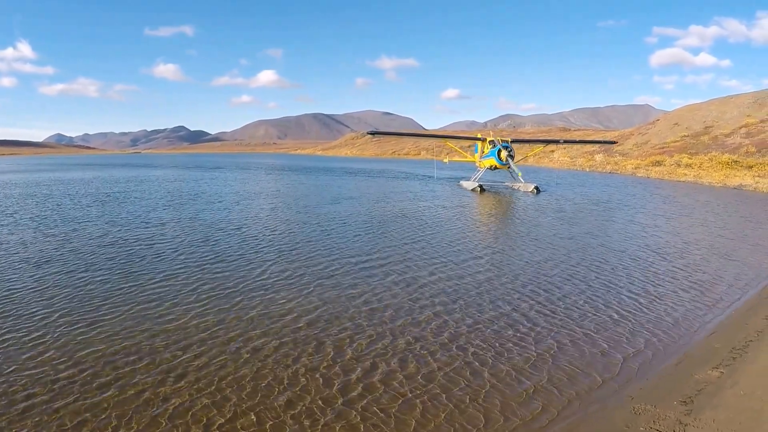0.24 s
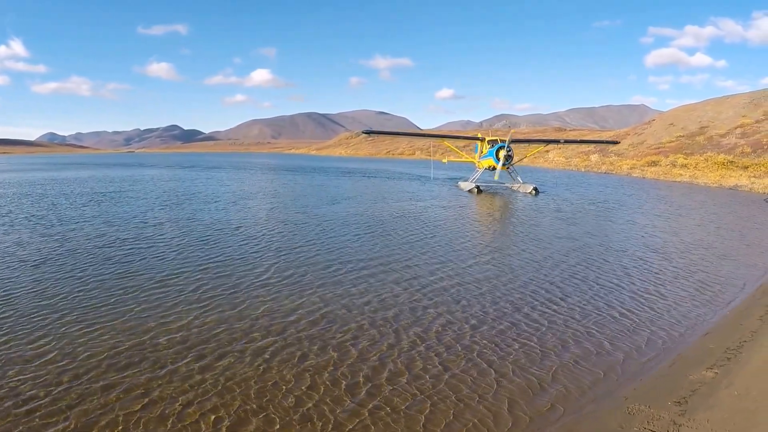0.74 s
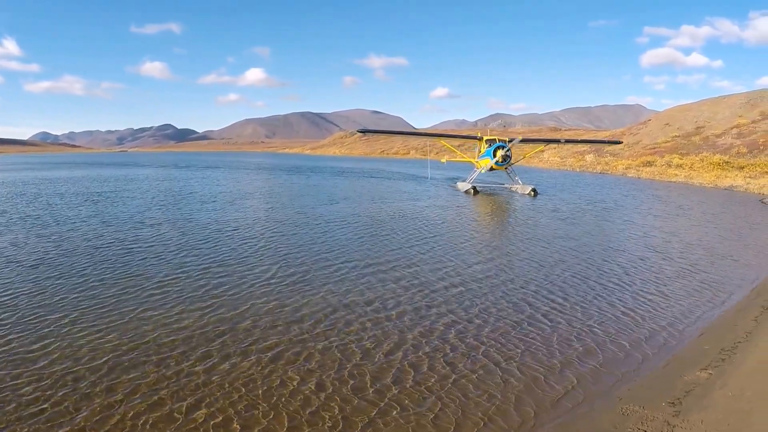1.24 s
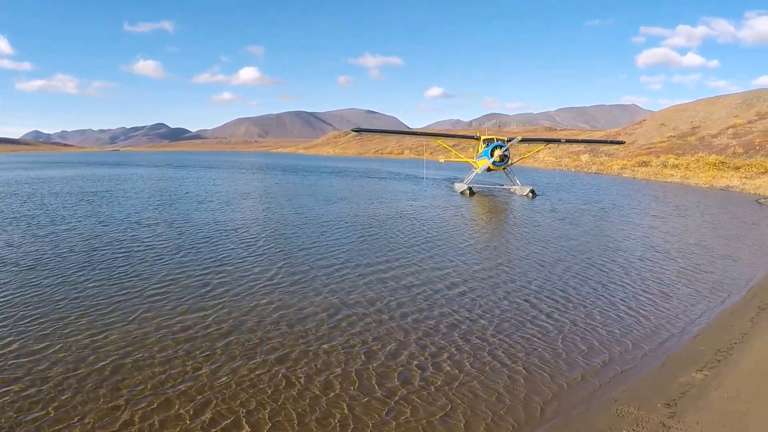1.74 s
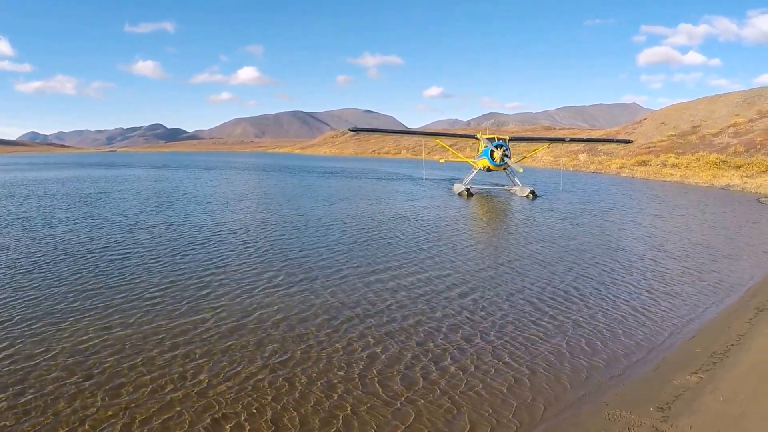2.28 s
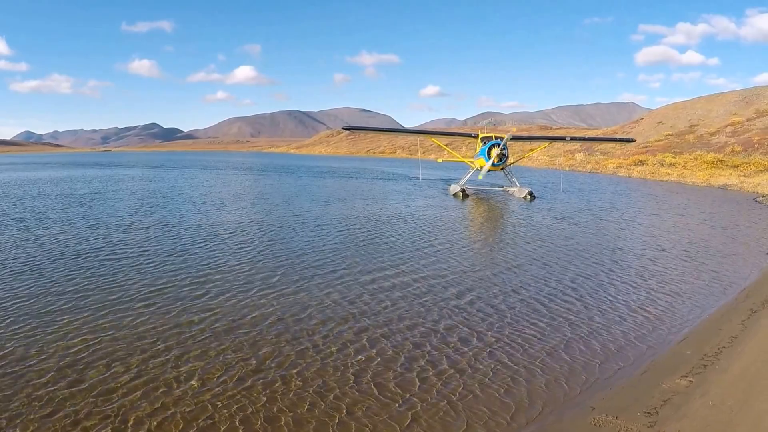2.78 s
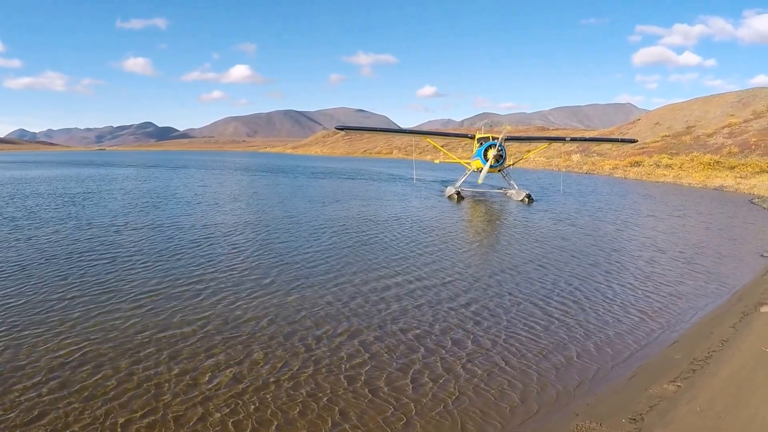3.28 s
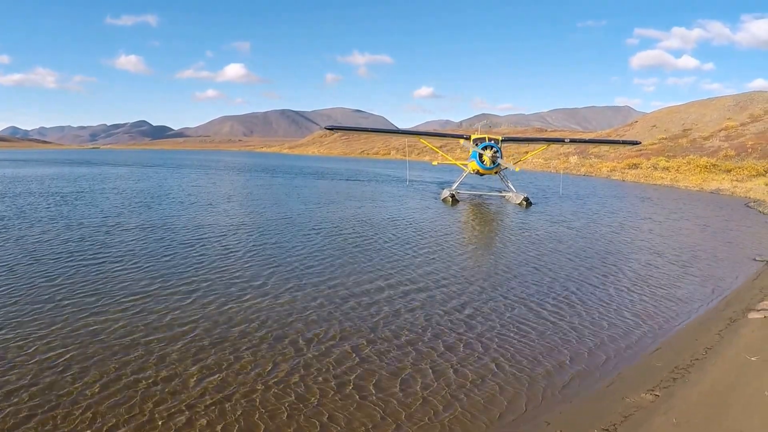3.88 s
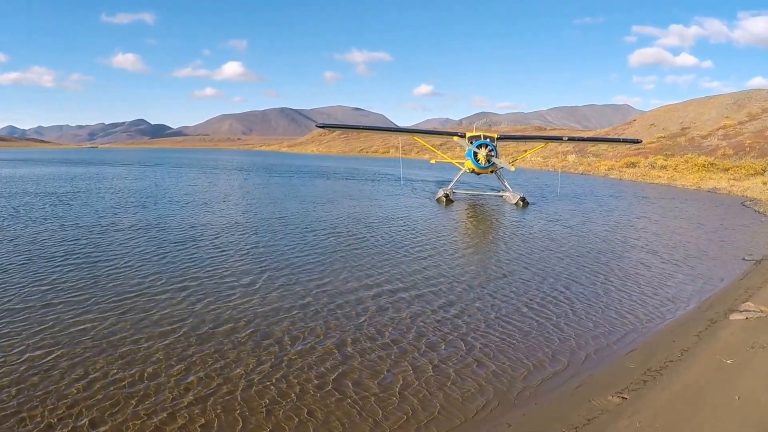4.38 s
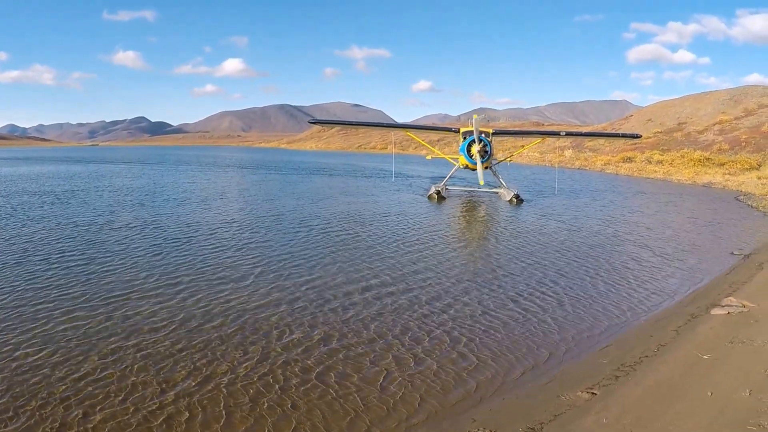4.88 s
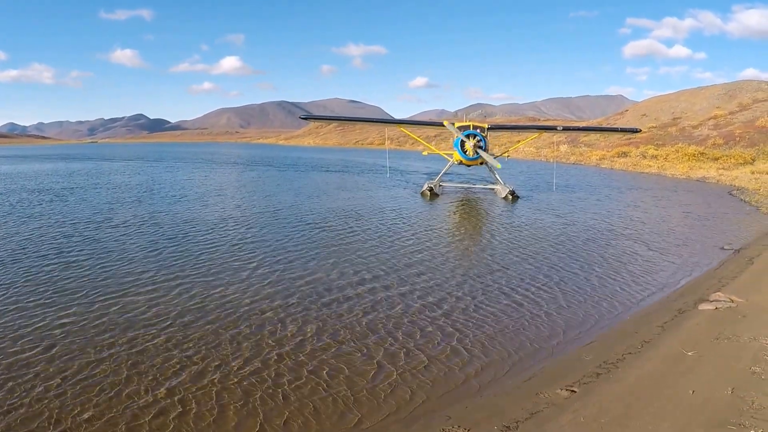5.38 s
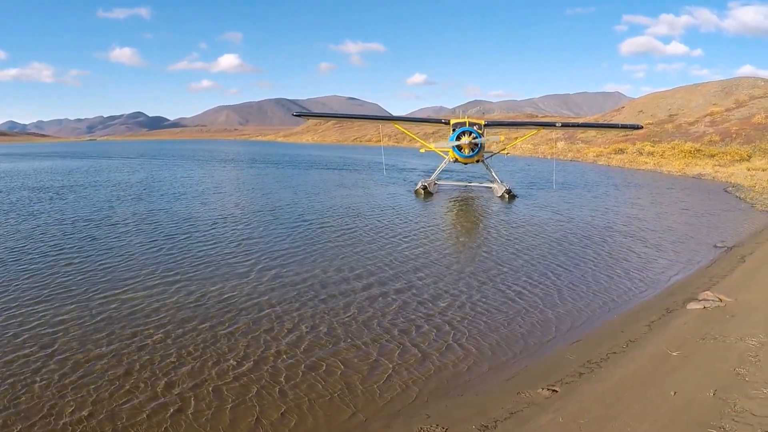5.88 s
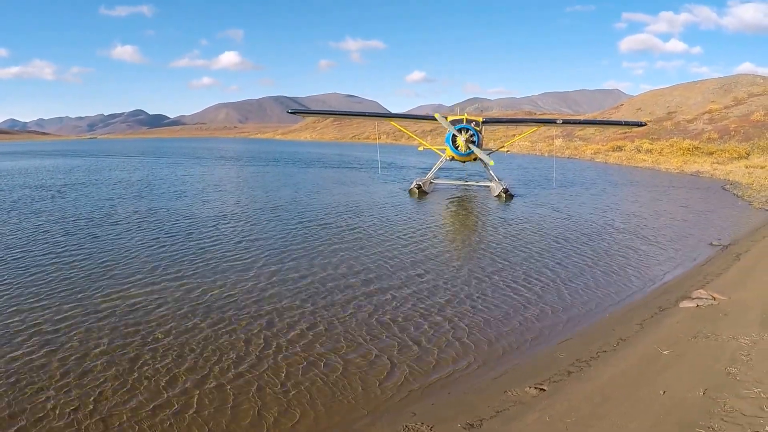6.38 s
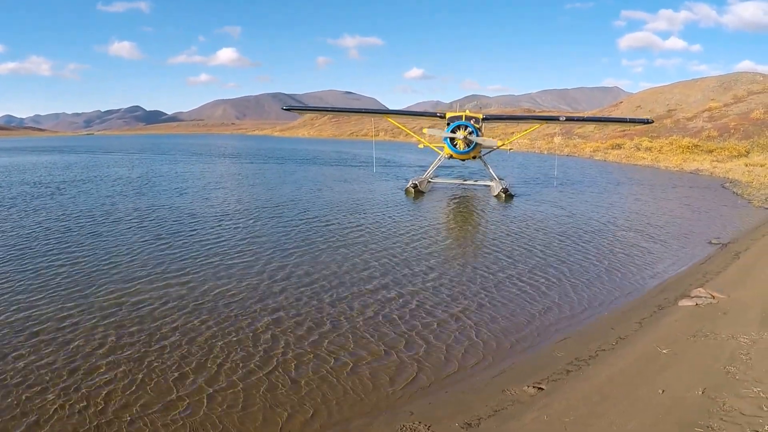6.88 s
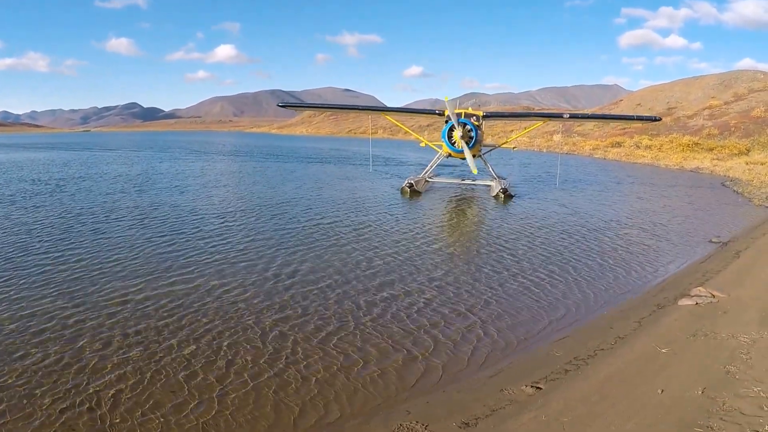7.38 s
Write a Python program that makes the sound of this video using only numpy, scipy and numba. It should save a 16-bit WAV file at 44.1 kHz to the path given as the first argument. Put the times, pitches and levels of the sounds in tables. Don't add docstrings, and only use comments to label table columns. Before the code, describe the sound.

Outdoors by a lake, strong wind thrums and slaps the microphone over the uneven idling putter of a floatplane's piston engine, gradually softening.

```python
import sys
import numpy as np
from scipy import signal
from scipy.fft import rfft, irfft, next_fast_len
from scipy.io import wavfile
from scipy.ndimage import uniform_filter1d
from numba import njit

SR = 44100
rng = np.random.default_rng(int(sys.argv[2]) if len(sys.argv) > 2 else 0)


def output_pcm(signal):
    pcm = np.clip(np.atleast_2d(signal).T, -1, 1) * 32767
    wavfile.write(sys.argv[1], SR, np.round(pcm).astype(np.int16))


def voltage_ratio(level):
    return 10 ** (np.asarray(level, float) / 20)


N = 336924
TIME = np.arange(N) / SR

# time in seconds, level in dB.
GUST_CURVE = [(0.0, -19), (0.5, -27.5), (0.9, -21.5), (1.2, -26), (1.5, -24), (2.3, -19.5), (2.6, -21.5),
              (3.54, -28.5), (3.73, -16.5), (3.96, -28), (4.32, -18.5), (4.85, -28), (5.5, -19.5),
              (6.15, -24), (6.5, -33.5), (7.3, -35.5), (7.46, -25.5), (7.64, -31)]
# start in seconds, ring level in dB, hiss level in dB, sharpness in dB above the hiss.
RINGING_FIRINGS = [(0.429, -39, -41, -23), (0.779, -38, -41, -29), (0.94, -42, -43, -23),
                   (1.468, -35, -38, -34), (1.621, -34.5, -39.5, -30), (2.278, -34, -42.5, -29),
                   (2.321, -38, -47, -25), (2.585, -38.5, -39, -12), (2.754, -33.5, -52, -20),
                   (2.889, -39, -36.5, -19), (3.399, -42, -48, -21), (3.555, -37, -36, -15),
                   (4.534, -42, -40.5, -27), (5.418, -35, -41, -6), (5.523, -35, -56, -25),
                   (5.631, -36.5, -46, -24.5), (5.878, -34, -40.5, -25), (5.937, -41, -51, -29),
                   (6.105, -39.5, -44, -25), (6.395, -38, -41.5, -23), (6.464, -40.5, -40.5, -30),
                   (6.535, -37.5, -45.5, -23), (6.651, -38, -41.5, -30), (6.789, -37, -57, -31),
                   (7.005, -36, -44, -18), (7.082, -41, -43, -24), (7.168, -39, -45.5, -16),
                   (7.319, -35, -43.5, -21), (7.5, -38, -68, -31), (7.585, -42, -41.5, -34)]


def level(x):
    return x / np.sqrt(np.mean(x ** 2))


def curve(table, t):
    return np.interp(t, *np.transpose(table))


@njit
def svf(x, hz, width):
    y, band_state, low_state = np.empty(len(x)), 0., 0.
    for i in range(len(x)):
        g = np.tan(np.pi * hz[i] / SR)
        k = width / hz[i]
        v = (band_state + g * (x[i] - low_state)) / (1 + g * (g + k))
        band_state = 2 * v - band_state
        low_state = low_state + 2 * g * v
        y[i] = k * v
    return y


def band(hz, width_hz):
    hz = hz + np.zeros(N)
    once = svf(rng.standard_normal(N), hz, 1. * width_hz)
    return level(svf(once, hz, 1. * width_hz))


def coloured(shape):
    hz, db = np.transpose(shape)
    size = next_fast_len(N)
    log_hz = np.log(np.arange(size // 2 + 1) * SR / size + 1)
    gain = voltage_ratio(np.interp(log_hz, np.log(hz), db, left=-90, right=-90))
    return level(irfft(rfft(rng.standard_normal(size)) * gain, size)[:N])


def walk(rate):
    k = int(SR / rate)
    held = np.repeat(rng.standard_normal(N // k + 1), k)
    x = uniform_filter1d(uniform_filter1d(held, k), k)[:N]
    return x / x.std()


def patchy(x, width_hz, seconds, depth_db):
    spectrum = signal.stft(x, nperseg=256)[2]
    field = rng.standard_normal(spectrum.shape)
    for axis, size in enumerate((width_hz * 256 / SR, seconds * SR / 128)):
        size = max(int(round(size)), 1)
        field = uniform_filter1d(uniform_filter1d(field, size, axis=axis), size, axis=axis)
    gain = voltage_ratio(depth_db * field / field.std())
    return level(signal.istft(spectrum * gain, nperseg=256)[1][:N])


def wind():
    # peak in seconds, level in dB, half length in seconds.
    swells = [(0.0, -11, 0.01), (0.182, -12, 0.046), (0.454, -23.5, .05), (0.69, -17.5, 0.032),
              (1.026, -18, 0.088), (1.304, -13, 0.028), (1.46, -16, 0.038), (1.844, -15.5, 0.1),
              (2.355, -16.5, 0.052), (2.589, -13, 0.055), (2.847, -21.5, 0.24), (3.254, -21.5, 0.21),
              (3.696, -25, 0.035), (4.17, -22, 0.13), (4.757, -21, 0.061), (4.973, -11.5, 0.026),
              (5.33, -25.5, 0.087), (5.517, -16.5, 0.038), (5.906, -25, .2), (6.236, -17, 0.016),
              (6.41, -25.5, 0.11), (6.703, -17.5, 0.012), (7.43, -23.5, 0.029), (7.596, -27, .02)]
    gust_db = curve(GUST_CURVE, TIME)
    power = voltage_ratio(gust_db - 0.5) ** 2
    for s, db, half_s in swells:
        power = power + voltage_ratio(db) ** 2 * np.exp(-((TIME - s) / half_s) ** 2)
    thrum_hz = 58.25 * (1 + 0.02998 * walk(4))
    phase = 2 * np.pi * np.cumsum(thrum_hz * (1 + 0.084 * walk(24))) / SR
    overtone = 0.14 * np.cos(2 * phase + 1.35 * walk(9))
    tone = np.sqrt(2) * (np.sin(phase) + overtone)
    thrum = (0.81 * tone * voltage_ratio(2.9 * walk(23.956)) + 0.8 * band(thrum_hz, 32.0)) * np.sqrt(power)
    rumble = band(30.7, 24.0) * voltage_ratio(gust_db - 0.5 - walk(3))
    flutter = band(125.4, 75.6) * voltage_ratio(gust_db - 8.5 + 3.65 * walk(22))
    return thrum + rumble + flutter


def swirls(count=3):
    # time in seconds, swing in Hz, peak in dB, length in seconds of the train they shed.
    slaps = [(0.054, 218, -18.5, 0.076), (0.196, 140, -20, 0.017), (0.31, 300, -14, 0.019),
             (0.429, 268, -16.5, 0.028), (0.831, 131, -12, 0.073), (1.321, 192, -20, 0.015),
             (1.437, 126, -10.5, 0.041), (1.467, 437, -8.5, .02), (1.637, 159, -15, 0.019),
             (1.695, 315, -15.5, 0.11), (1.922, 437, -14, 0.085), (2.343, 218, -15, 0.024),
             (2.592, 406, -13.5, 0.13), (3.011, 370, -22.5, 0.021), (3.722, 290, -17.5, 0.12),
             (4.169, 266, -18, 0.023), (4.27, 243, -13, .08), (4.4, 287, -11.5, 0.063),
             (4.51, 192, -23, .03), (4.699, 136, -18, 0.026), (4.956, 242, -10.5, 0.14),
             (5.208, 218, -17.5, 0.035), (5.319, 278, -6, 0.059), (5.526, 500, -6.5, .02),
             (5.6, 297, -13.5, 0.046), (5.72, 229, -16, .05), (5.817, 314, -8.5, .03),
             (5.987, 231, -10, 0.062), (6.137, 167, -17, 0.013), (7.483, 200, -21, .02)]
    s, hz, db, train_s = np.transpose(slaps)
    heave = (s + 0.0069, 50.7 + 0 * s, db - 6)
    spit = (s - .002, hz * 1.72, db - 12)

    lag, pitch, size = rng.random((len(slaps), count, 3)).T
    order = np.arange(count)[:, None]
    shed_s = s + train_s * (order + lag) / count
    shed_hz = hz * 2 ** (.8 * (2 * pitch - 1) - .6)
    shed_db = db - 5.5 * (.5 + size) - 2 * order
    shed = np.reshape((shed_s, shed_hz, shed_db), (3, -1))

    place, pitch, size = rng.random((150, 3)).T
    stray_s = (np.arange(150) + place) / 8.3
    stray_hz = 160.5 * 2 ** (1.2 * pitch ** 2)
    stray_db = curve(GUST_CURVE, stray_s) - 1.5 + 3.5 * (2 * size - 1)
    stray = np.array([stray_s, stray_hz, stray_db])[:, stray_s < TIME[-1]]
    return np.hstack([(s, hz, db), heave, spit, shed, stray]).T


def eddies(turns=0.77, base_db=-4, wake_db=-9):
    out = np.zeros(N + SR)
    margin = np.zeros(2000)
    coarse_wake = np.concatenate([margin, band(170, 114), margin])
    fine_wake = np.concatenate([margin, band(380, 247), margin])
    rows = swirls()
    chance = rng.random((len(rows), 3))
    for (s, hz, db), (phase, base_phase, lag) in zip(rows, chance):
        t = np.arange(-2000, 2000) / SR * hz
        swing = np.exp(-.5 * (t / turns) ** 2) * np.cos(2 * np.pi * (t + phase))
        u = 0.443 * t - 0.87 * (lag - .5)
        base = np.exp(-.5 * (u / turns) ** 2) * np.cos(2 * np.pi * (u + base_phase))
        start = int(s * SR)
        wake = fine_wake if int(hz) > 280 or hz > 280 else coarse_wake
        ragged = wake[start:start + len(t)] * np.exp(-.5 * ((t - .6) / 1.26) ** 2)
        slap = swing + voltage_ratio(base_db) * base + voltage_ratio(wake_db) * ragged
        out[start:start + len(t)] += voltage_ratio(db - 3.5) * np.hanning(len(t)) * slap
    return out[2000:N + 2000]


def wash():
    # time in seconds, level in dB.
    roar_curve = [
        (0.0, -42),
        (1.42, -42),
        (2.36, -38.5),
        (3.36, -40.5),
        (4.6, -41.5),
        (6.23, -44),
        (7.4, -49.5),
        (7.64, -51),
    ]
    # frequency in Hz, density in dB per Hz.
    low_spectrum = [(150, -38), (250, -29), (410, -8.5), (615, -5.5), (828, -11.5), (1110, 4.5), (1230, 0),
                    (1380, -3), (1800, -11), (2340, -40), (3960, -120)]
    high_spectrum = [(880, -29.5), (1500, -5), (1930, 2), (2940, 3.5), (4160, -6.5), (5720, -9.5),
                     (8410, -23.5), (13800, -31), (15000, -32)]
    low_db = curve(roar_curve, TIME)
    high_db = low_db - 6 - 0.26 * TIME
    flicker = walk(26)
    low = patchy(coloured(low_spectrum), width_hz=330, seconds=.014, depth_db=3.0)
    high = patchy(coloured(high_spectrum), width_hz=400, seconds=.012, depth_db=3.5)
    return low * voltage_ratio(low_db + 0.57 * flicker) + high * voltage_ratio(high_db + 0.5 + 0.72 * flicker)


def firings():
    # peak in seconds, hiss level in dB, whistle in dB above the hiss.
    blows = [(0.045, -36, -22), (0.124, -34, -12), (0.195, -36, 2), (0.234, -33.5, -9), (0.416, -39.5, -24),
             (0.649, -38.5, 1), (0.726, -44, -24), (0.847, -34.5, 3.5), (0.887, -35.5, -16),
             (0.969, -36.5, -6), (1.001, -36.5, -2), (1.042, -36, -4), (1.12, -34, 5.5), (1.272, -34, -3),
             (1.418, -39, -11), (1.571, -35.5, 3.5), (1.649, -41, 1), (1.683, -34.5, -11), (1.721, -38, 7),
             (1.793, -33, -3), (1.83, -40, -14), (1.862, -39.5, 1), (1.941, -36.5, 2.5), (2.086, -37, -3.5),
             (2.226, -40, 2.5), (2.34, -32.5, -24), (2.375, -38.5, -3), (2.446, -35.5, 1), (2.708, -43, 6),
             (2.843, -35.5, -1.5)]
    # peak in seconds, hiss level in dB, sharpness in dB above the hiss.
    pops = [(0.58, -38, -29), (2.303, -40.5, -15), (2.506, -38, -9.5), (3.046, -45.5, -11),
            (3.212, -39.5, -24), (3.621, -43, -13), (3.743, -47, -19), (3.838, -43, -14),
            (3.919, -39.5, -36), (4.036, -47, -3.5), (4.128, -44, -25), (4.309, -35.5, -22),
            (4.474, -49.5, 0.5), (4.663, -40, -6), (4.719, -35.5, -21), (4.952, -39, -28), (5.304, -43, -4),
            (5.473, -42, -19), (5.505, -42, -8), (5.675, -42.5, -19), (5.721, -40.5, -12),
            (5.837, -42, -33), (6.001, -43, -35), (6.155, -46, -22), (6.282, -38.5, -43),
            (6.337, -42.5, -34), (6.705, -45.5, -26), (6.935, -45, -31), (6.971, -45.5, -20),
            (7.393, -36, -44)]
    # time in seconds, firings per second.
    pace = [
        (0, 28.5),
        (2.9, 29.5),
        (7.64, 24),
    ]
    pop_whistle_db = -7.5
    blow_s, blow_db, blow_whistle_db = np.transpose(blows)
    pop_s, pop_db, pop_sharp_db = np.transpose(pops)
    ring_s, _, ring_db, ring_sharp_db = np.transpose(RINGING_FIRINGS)
    puff_s = ring_s - 0.005
    strong = np.hstack([(blow_s, blow_db, blow_whistle_db, -9.5 + 0 * blow_s),
                        (pop_s, pop_db, pop_whistle_db + 0 * pop_s, pop_sharp_db),
                        (puff_s, ring_db, pop_whistle_db + 1.5 + 0 * ring_s, ring_sharp_db)])

    chance = rng.standard_normal((240, 4)).T
    fired = np.cumsum(curve(pace, TIME)) / SR
    s = np.interp(np.arange(240), fired, TIME) + 0.0062 * chance[0]
    weak_db = -48.5 - 1.0 * s + 6 * chance[1]
    weak = np.array([s, weak_db, pop_whistle_db + 3.2 * chance[2], -26.5 + 9.0 * chance[3]])
    free = np.abs(s[:, None] - strong[0]).min(axis=1) > .02
    return np.hstack([strong, weak[:, free & (s > 0) & (s < TIME[-1] - .03)]])


def puffs(s, db, stretch, rise, fall, tail, tail_db):
    out = np.zeros(N + SR)
    for start, gain, wide in zip((s * SR).astype(int), voltage_ratio(db), stretch):
        t = np.arange(-1500, 6000) / SR / wide
        before = t < 0
        span = np.where(before, 1.16 * rise * wide, fall)
        peak = np.exp(-.5 * np.abs(t / span) ** np.where(before, 3.5, 2))
        scattered = voltage_ratio(tail_db) * (t > 0) * (1 - peak) * np.exp(-t * wide / tail)
        out[start:start + len(t)] += gain * (peak + scattered)
    return out[1500:N + 1500]


def exhaust():
    # frequency in Hz, density in dB per Hz.
    hiss_spectrum = [(880, -29), (1500, -9), (1770, -5), (2130, -3.5), (2900, -5.5), (4620, -9),
                     (5330, -11.5), (6970, -16.5), (9000, -28.5), (11700, -52), (19800, -120)]
    s, db, whistle_db, sharp_db = firings()
    stretch = np.clip(1 + 0.027 * (sharp_db + 15.5), .45, 1.6)

    gas = voltage_ratio(2.44 * walk(180)) * patchy(coloured(hiss_spectrum), width_hz=350, seconds=.016, depth_db=3.5)
    hiss = gas * puffs(s, db + 0.057, stretch, rise=0.0057, fall=0.0098, tail=0.021, tail_db=-10.0)
    lip = band(2090 * (1 + 0.02 * walk(9.2)), 150)
    whistle = lip * puffs(s, db + whistle_db + .5, stretch, rise=0.0039, fall=0.006, tail=0.024, tail_db=-10.5)
    top = patchy(band(5500, 8700), width_hz=500, seconds=.008, depth_db=0.5)
    sharp = top * puffs(s, db + sharp_db - .5, stretch, rise=0.0042, fall=0.0049, tail=0.024, tail_db=-7.0)

    ring_s, ring_db = np.transpose(RINGING_FIRINGS)[:2]
    stub = band(1170 * (1 + 0.074 * walk(14)), 700)
    throat = voltage_ratio(1.0 + 4.0 * walk(20)) * band(610 * (1 + 0.13 * walk(13)), 160)
    every = puffs(s, db - 10.5, stretch, rise=0.0074, fall=0.0093, tail=0.051, tail_db=-8.5)
    loud = puffs(ring_s, ring_db - .5, np.ones(len(ring_s)), rise=0.0054, fall=0.0073, tail=0.015, tail_db=-4.5)
    pipe = (stub + throat) * every + stub * loud

    collector = band(148.5, 30)
    boom_db = db + sharp_db + 15.5 - 2.2 * s
    boom = collector * puffs(s, boom_db, stretch, rise=0.0084, fall=0.023, tail=0.033, tail_db=-7)
    return boom + hiss + whistle + sharp + pipe


def scene():
    return (wind() + eddies() + wash() + exhaust())[None]


def thinned(x, keep=0.26):
    hz, _, spectrum = signal.stft(x, SR, nperseg=1024)
    size = np.abs(spectrum)
    threshold = uniform_filter1d(size, 17, axis=0) * np.sqrt(-4 / np.pi * np.log(keep))
    middle = 1.46 * (size > threshold) * (hz[:, None] < 3500)
    gain = np.where(hz[:, None] < 900, 1, middle)
    return signal.istft(spectrum * gain, SR, nperseg=1024)[1][..., :N]


def top_cut(x):
    return signal.sosfilt(signal.butter(12, 15350, fs=SR, output="sos"), x)


def record(dry):
    dropouts = [3.302, 6.288, 6.757, 6.908, 7.25, 7.394, 7.406, 7.419]
    capsule_hiss = voltage_ratio(-76.5) * band(11000, 9000)
    x = np.tanh(.45 * dry) / .45 + capsule_hiss
    lost = np.minimum(sum(np.exp(-.5 * ((TIME - s) / .008) ** 4) for s in dropouts), 1)
    x = x + lost * (thinned(x[0]) - x)
    low_pass = signal.ellip(8, .2, 60, 15330, fs=SR, output="sos")
    return top_cut(signal.sosfilt(low_pass, x))


dry = scene()
out = record(dry)
output_pcm(out)
```